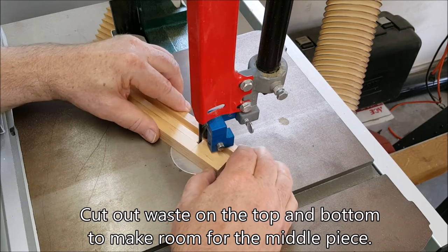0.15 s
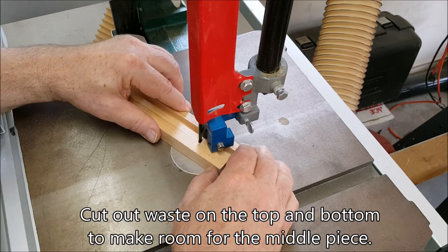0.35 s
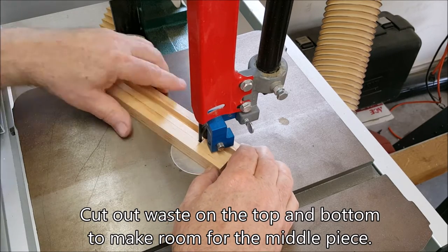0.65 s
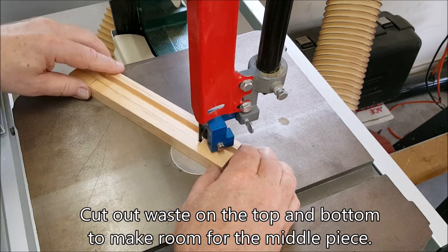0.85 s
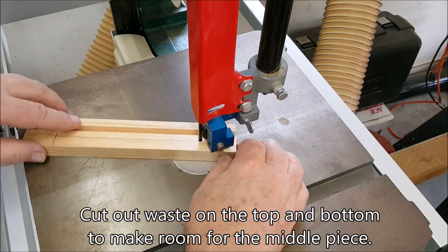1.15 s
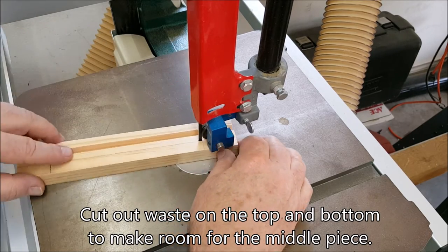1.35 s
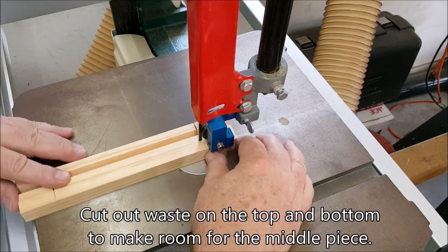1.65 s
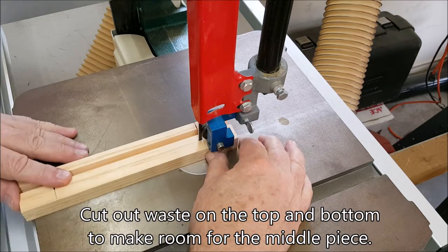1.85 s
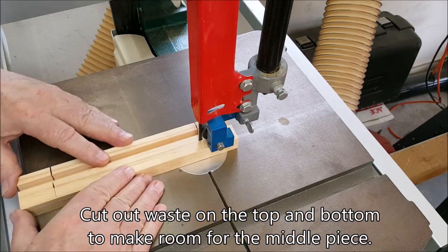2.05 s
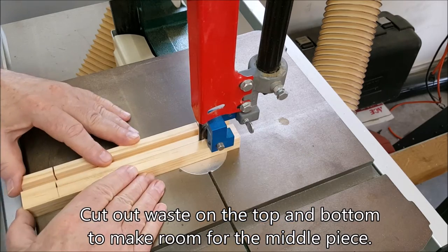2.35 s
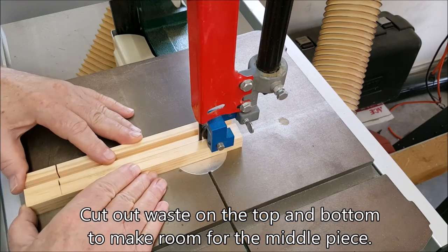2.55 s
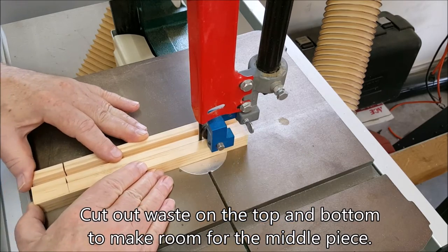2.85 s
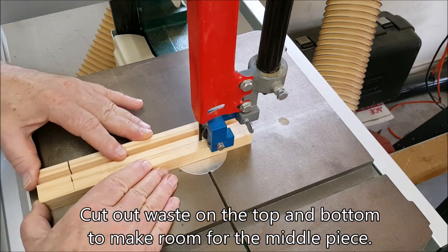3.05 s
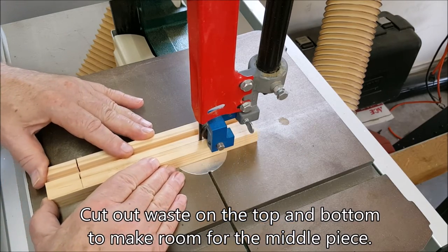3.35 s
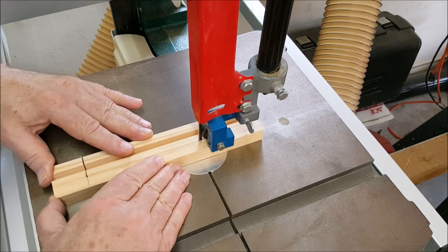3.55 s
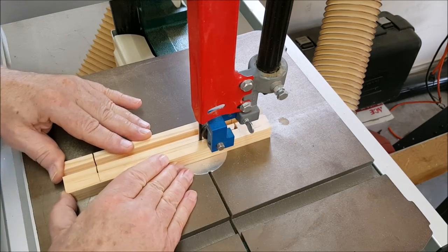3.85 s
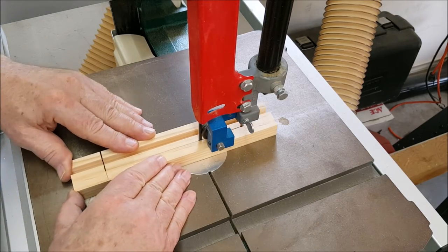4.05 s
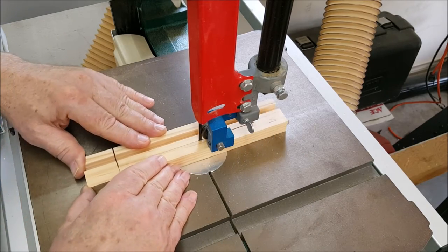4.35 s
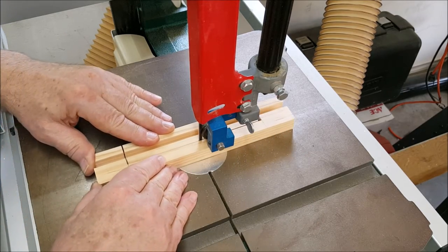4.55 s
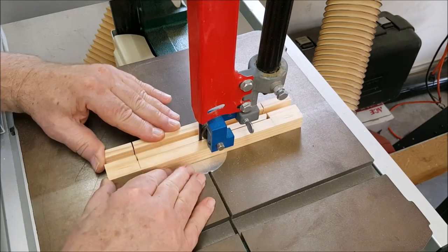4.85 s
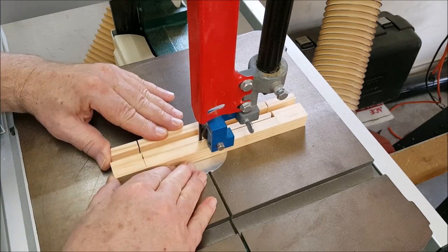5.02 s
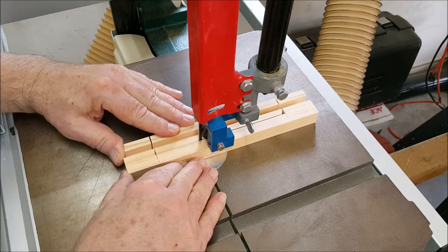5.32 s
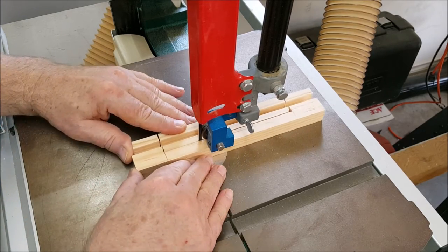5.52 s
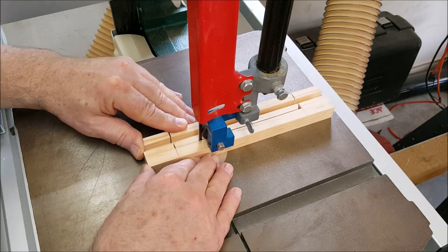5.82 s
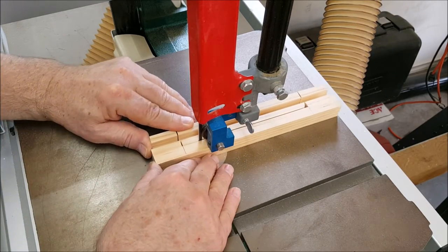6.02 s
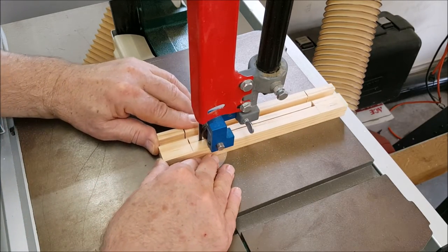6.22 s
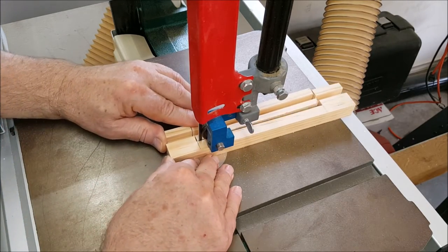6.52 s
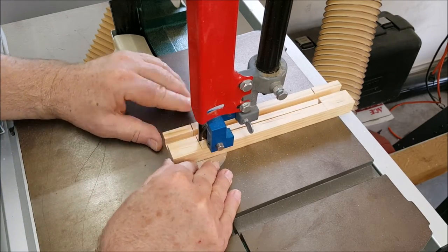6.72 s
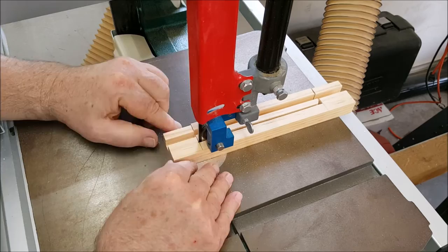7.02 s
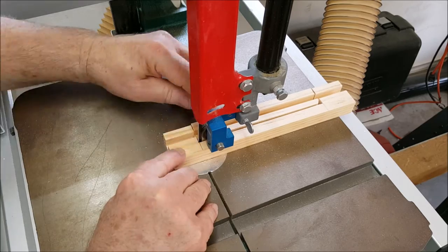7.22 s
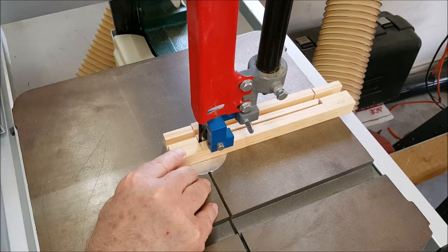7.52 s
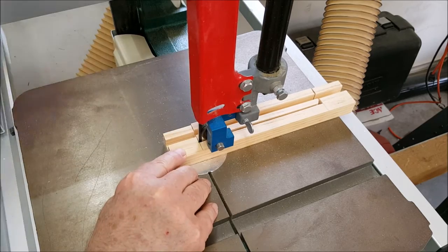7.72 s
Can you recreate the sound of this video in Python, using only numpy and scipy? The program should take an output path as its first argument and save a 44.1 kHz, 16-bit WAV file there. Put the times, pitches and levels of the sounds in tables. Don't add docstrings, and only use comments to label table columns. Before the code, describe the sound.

A bandsaw roars steadily in a workshop; wood brushes the blade, then is cut lengthwise with whining, squealing and rasping that stops at the end.

```python
import sys
import numpy as np
from scipy import signal
from scipy.io import wavfile
from scipy.ndimage import uniform_filter1d

SR = 44100
rng = np.random.default_rng(int(sys.argv[2]) if len(sys.argv) > 2 else 0)


def rack_gain(trim_db):
    fader = np.asarray(trim_db, float)
    return 10 ** (fader / 20)


def waveform_to_disk(signal):
    frames = np.transpose(np.atleast_2d(signal))
    scaled = np.clip(frames, -1, 1) * 32767
    samples = np.round(scaled).astype(np.int16)
    wavfile.write(sys.argv[1], SR, samples)


N = 347508
T = np.arange(N) / SR
EXIT_S = 6.0

# time [s], turning rate [Hz],
# share of deep cutting [0-1].
ROLLER_RUN = [(0, 501.3, 0), (.6, 501.1, 0), (.85, 497.5, 0), (1.1, 500.3, 0), (2.3, 499.8, 0),
              (2.55, 499.4, 1), (3.2, 498.7, 1), (6.2, 498.3, 1), (6.62, 499.3, 1), (6.72, 498.5, 0),
              (7.0, 496, 0), (7.6, 495.2, 0), (7.88, 492, 0)]
# frequency [Hz], left over right [dB].
EAR_LEAN = [(60, 1), (130, -0.5), (290, -0.5), (640, 0.0), (1410, 2.5), (3100, -1.5), (6820, 1),
            (15000, -1.5)]
# frequency [Hz], lead of the left [rad].
EAR_LEAD = [(20, -0.5), (800, 0), (1000, 0.32), (1600, 0), (3000, -0.3), (4500, 0), (6500, 1.55),
            (8500, 1.27), (13000, 1.1), (16500, 4)]


def read(points, hz):
    f, value = np.transpose(points)
    return np.interp(np.log(hz + 1), np.log(f + 1), value)


def columns(rows, silent=-110):
    s, *values = np.transpose(rows)
    return [np.interp(T, s, v, left=silent, right=silent) for v in values]


def bells(rows):
    s, half_s, db = np.transpose(rows)[..., None]
    return np.exp(-((T - s) / half_s) ** 2), db


def drift(rate_hz):
    knots = rng.standard_normal(4000)
    return 1.22 * np.interp(T * (rate_hz * 2), np.arange(4000), knots)


def humps(modes, hz):
    return sum(db / (1 + (2 * (hz - f) / width_hz) ** 2) for f, width_hz, db in modes)


def tone(hz, db, waver_hz, direct, blur_hz=25):
    carrier = np.exp(2j * np.pi * np.cumsum(hz + waver_hz * drift(30)) / SR)
    centre_hz = np.mean(hz)
    direct, blur_hz = np.clip(direct, 0, 1), np.clip(blur_hz, 1, 250)
    side = np.array([[0.5], [-0.5]])
    ears = np.exp(1j * side * read(EAR_LEAD, centre_hz)) * rack_gain(side * read(EAR_LEAN, centre_hz))
    scatter = np.array([drift(blur_hz) + 1j * drift(blur_hz) for ear in "LR"])
    scatter = scatter * np.sqrt((1 - direct) / 2)
    return np.sqrt(2) * rack_gain(db) * (carrier * ears * (np.sqrt(direct) + scatter)).real


def noise(shape_db, likeness, patchy_db, size):
    # frequency [Hz], likeness of the ears [0-1].
    ear_likeness = [(25, .5), (70, .3), (130, 0.79), (300, 0.78), (640, 0.92), (1400, 0.7), (2500, 0.56),
                    (6800, 0.49), (15000, 0.39)]
    hz, hop = np.fft.rfftfreq(size, 1 / SR), size // 4
    a, b, c, d, patches = rng.standard_normal((N // hop + 5, len(hz), 5)).T
    patches = uniform_filter1d(patches, size=size // 100, axis=0)
    patches = uniform_filter1d(patches, size=12000 // size, axis=1)
    patches_db = patchy_db * patches / patches.std()

    same = np.clip(likeness * read(ear_likeness, hz), 0, 1)[:, None]
    left = a + 1j * b
    right = same * left * np.exp(-1j * read(EAR_LEAD, hz))[:, None] + np.sqrt(1 - same ** 2) * (c + 1j * d)

    ripple = uniform_filter1d(rng.standard_normal((3, len(hz))), size=size // 800 + 1, axis=1)[..., None]
    level, tilt, turn = ripple / ripple.std() * np.clip(hz / 2500, 0, 1)[:, None]
    right = right * np.exp(1j * 1.18 * turn)
    lean_db = read(EAR_LEAN, hz)[:, None] / 2 + 0.63 * tilt

    z = np.array([left * rack_gain(lean_db), right * rack_gain(-lean_db)])
    z = z * rack_gain(shape_db(hz)[:, None] + 2.2 * level + patches_db)
    out = signal.istft(z, nperseg=size, noverlap=size - hop)[1][:, :N]
    return out / out.std()


def throb(wheel_db, pulley_db, wander_db):
    turn = 2 * np.pi * 14.6 * T
    belt = 2 * np.pi * 31.55 * T
    wheel = np.sin(turn) + np.sin(2 * turn + 1) + 0.5 * np.sin(3 * turn)
    pulley = np.sin(belt) + 0.3 * np.sin(2 * belt)
    return wheel_db * wheel + pulley_db * pulley + wander_db * drift(8.2)


def machine():
    # frequency [Hz], density [dB per Hz].
    roar_shape = [(15, -21.5), (30, -32), (70, -61), (120, -31), (170, -20), (300, -12.5), (600, -3),
                  (1200, -2.5), (1500, -7), (3000, -10.5), (6000, -13.5), (10500, -16.5), (14500, -22.5),
                  (16500, -16.5)]
    # frequency [Hz], width [Hz], height [dB].
    housing_modes = [(237, 15, 6), (320, 40, 5), (455, 25, 5), (480, 10, 4), (500, 30, -5), (575, 20, -6),
                     (615, 30, 6), (680, 35, 4), (762, 25, 5), (795, 15, -5), (820, 35, 10), (865, 20, -5),
                     (945, 40, 6), (1030, 50, 4), (1155, 50, 5), (1250, 60, 5), (1330, 50, -3),
                     (1665, 30, -5), (2175, 80, 12), (2235, 25, -4), (2275, 45, 9), (2390, 40, 7),
                     (2430, 35, 6), (2490, 80, -4), (2590, 60, 3), (3020, 100, 4), (3340, 80, 3)]
    # frequency [Hz], width [Hz], height
    # [dB].
    band_modes = [(4450, 700, 3), (5630, 130, 10), (6550, 160, 7), (6885, 70, 8), (7280, 70, 5),
                  (8030, 90, 5), (8430, 150, 4), (10400, 200, 5), (12440, 200, 6), (15300, 900, 6)]
    # frequency [Hz], level [dB].
    hum_lines = [(480, -72), (1412, -61), (1441, -62), (1921, -70), (2118, -70), (2153, -64), (2632, -68),
                 (2824, -65), (2868, -72), (3111, -73)]

    def shape_db(hz):
        return read(roar_shape, hz) + humps(housing_modes + band_modes, hz)

    roar = rack_gain(-43 + 0.13 * drift(2.3)) * noise(shape_db, 1.117, 0.84, size=4096)
    return roar + sum(tone(hz + 0 * T, db, 0.7, 1.0) for hz, db in hum_lines)


def load():
    # start [s], end [s], whine [dB], sag [dB per s].
    touches = [
        (0.074, 0.6, -43.5, -4),
        (1.057, 1.605, -43.5, 0),
        (1.742, 6.723, -43.5, -.5),
    ]
    # time [s], half length [s], change [dB].
    nudges = [
        (1.32, 0.023, -3),
        (1.93, 0.024, 4.5),
        (2.05, 0.075, -3.5),
        (2.22, 0.026, -9),
        (2.3, .1, 2),
        (3.6, 0.05, 0),
        (4.5, 0.32, -2.5),
        (4.95, 0.13, 3),
        (6.1, 0.089, -2.5),
        (6.55, 0.13, 1),
    ]
    rise_s, fall_s, free_db = 0.07, 0.0636, -60.5
    s, end_s, db, sag = np.transpose(touches)[..., None]
    held = np.clip(np.minimum((T - s) / rise_s, 1 + (end_s - T) / fall_s), 0, 1)
    hump, nudge_db = bells(nudges)
    return free_db + (held * (db + sag * (T - s) - free_db)).sum(0) + (hump * nudge_db).sum(0)


def rollers(grip_db):
    # overtone order, then level [dB] at first brush, later brushes, cutting, coasting.
    overtones = [("3", -65, -64, -56, -93), ("6", -80, -88, -68, -68.5), ("8", -74, -82, -69, -68.5),
                 ("11", -69, -81, -78, -90), ("13", -62, -63, -69, -78), ("16", -61, -62, -72, -91.5),
                 ("19", -76, -70, -72, -63), ("20", -62, -78, -82, -65), ("21", -62, -59, -63, -64),
                 ("25", -66, -65, -76, -67), ("26", -72, -78, -65, -81), ("27", -58, -62, -80, -67),
                 ("28", -74, -78, -80, -81)]
    # frequency [Hz], level [dB].
    side_lines = [(554.5, -57.5), (1109, -57.5), (1385, -57)]
    whine_db = load()
    rate_hz, deep = columns(ROLLER_RUN)
    contact = np.clip((whine_db + 60) / 9, 0, 1)
    free = 1 - contact
    rate_hz = rate_hz + (0.3 + 0.4 * free) * drift(12)

    out = tone(2 * rate_hz, whine_db + 2 * drift(4) * free + 0.7 * drift(18), 0.5, 0.98)
    run_out = rack_gain(-4 * np.clip(T - EXIT_S, 0, 1))
    for order, *levels_db in overtones:
        order = int(order)
        first, later, cut, coast = rack_gain(levels_db)
        brush = np.where(T < 0.85, first, later)
        gain = (1 - deep) * (contact * brush + free * coast) + deep * cut * run_out
        out += gain * tone(order * rate_hz, 2.3 * drift(5.2), order * (0.17 + 0.93 * free), 0.77, 30)
    out += tone(22 * rate_hz, -56 + 0.9 * grip_db - 12 * (1 - deep), 7, 0.55)

    lean = 0.46 + 0.62 * uniform_filter1d(contact, SR // 3)
    side = sum(tone(hz * rate_hz / 498.5, db + 1.8 * drift(7.1), 1.87, 0.69, 19) for hz, db in side_lines)
    return out + lean * side


def teeth():
    # time [s], half length [s], bite [dB].
    nicks = [
        (0, 0.043, -3.5),
        (.2, 0.17, -4.5),
        (.58, .08, -13),
        (1.05, 0.037, -4),
        (1.18, 0.078, -2.5),
        (1.32, 0.073, -6),
        (1.77, 0.043, -3),
        (1.9, 0.25, -4.5),
    ]
    # time [s], bite of the teeth [dB], grip of the kerf on the band [dB].
    cut_course = [(2.14, -12, -14), (2.24, -4, -19), (2.55, -1, -16), (2.85, 0, -6), (3.2, 0, -7),
                  (3.65, 0, -4), (4.0, -1, -1.5), (4.3, 0, 3), (4.7, -0.5, 4), (4.88, -1.5, -2),
                  (5.05, -0.5, 3.5), (5.6, -1, 2), (5.85, -1, -6), (6.1, -1, -2), (6.38, -1.5, 0.5),
                  (6.55, -4.5, -6), (6.64, -1.5, -9), (6.69, -8, -20)]
    idle_bite_db, nick_grip_db = -17.5, -25
    joint_s, loop_s, joint_half_s = 4.2, 0.412, 0.045
    hump, nick_db = bells(nicks)
    nick_db = idle_bite_db + (hump * (nick_db - idle_bite_db)).max(0)
    bite_db, grip_db = columns(cut_course)

    loop = ((T - joint_s) / loop_s + 0.5) % 1 - 0.5
    joint = np.exp(-(loop * loop_s / joint_half_s) ** 2)
    joint += 0.13 * np.exp(-((abs(loop) - 0.5) * loop_s / joint_half_s) ** 2)
    joint *= np.clip((T - 3.1) / 0.43, 0, 1)
    return np.maximum(bite_db, nick_db), np.maximum(grip_db, nick_db + nick_grip_db), joint


def squeal(bite_db, grip_db):
    exit_db = -19 * np.clip(T - EXIT_S, 0, 0.6)
    first_db = -51.5 + 0.84 * bite_db + exit_db
    second_db = -55.5 + 0.54 * bite_db - 0.42 * np.maximum(grip_db + 17, 0) + exit_db
    third_db = -46.0 + 0.2 * bite_db + 0.45 * grip_db
    deep = np.clip((T - 2.1) / 0.15, 0, 1)
    hz = 4557 - 21.5 * deep + 2 * drift(25)
    beat = 1 + 0.47 * np.sin(2 * np.pi * 189.5 * T)
    low = tone(hz + 5, first_db + throb(0.4, 3, 0.5), 4, 0.88, 30)
    low += tone(2 * hz, second_db + throb(0.17, 0.62, 0.2), 11.44, 0.11, 35)
    return low + beat * tone(3 * hz, third_db + throb(0.3, 1.3, 0.46), 10.4, 0.95, 45)


def kerf(bite_db, grip_db, joint):
    # frequency [Hz], density [dB per Hz].
    rasp_shape = [(1500, -25), (3000, -0.5), (4600, 11), (5600, 5.5), (6200, -1), (7500, 5.5), (9000, 3),
                  (9800, 5.5), (11500, -0.5), (13000, 6), (14500, 5), (16500, -8)]
    # frequency [Hz], width [Hz], height [dB].
    loaded_modes = [(4400, 400, 4), (5560, 280, 6), (6540, 150, 5), (8040, 110, 11), (8500, 500, 5),
                    (9500, 160, 6), (9760, 200, -4), (10460, 140, 9), (12600, 400, 4), (13250, 300, 5),
                    (15500, 300, 0)]
    low_notes_hz = (4170, 4255, 4405, 4450, 4735)
    rasp_db = -42.5 + 1.26 * bite_db - 1.6 * joint
    low_db = -65.5 + 0.4 * bite_db - 1.5 * joint
    middle_db = -58 + 1.1 * bite_db - 9 * joint + 3.1 * np.clip((T - EXIT_S) / 0.079, 0, 1)
    top_db = -50.0 + 0.9 * grip_db + 5 * joint
    deep = columns(ROLLER_RUN)[1]

    def shape_db(hz):
        return read(rasp_shape, hz) + humps(loaded_modes, hz)

    rasp = rack_gain(rasp_db + throb(0.11, 0.59, 0.3)) * noise(shape_db, 1.76, 0.57, size=1024)
    swing_db = throb(1.6, 3, 0.8)
    half_db = 0.5 * swing_db
    warble = 1 + 0.0009 * swing_db
    chatter = tone(13075 * warble + 30 * drift(3.0), top_db - 4 + swing_db, 33.3, 0.36, 60)
    chatter += tone(12620 * warble, top_db - 13 + swing_db, 40, 0.2, 100)
    for hz in (8370, 8560, 8800):
        chatter += tone(hz + 0 * T, middle_db + half_db + 1.3 * drift(14), 29, 0.1, 110)
    for hz in low_notes_hz:
        chatter += tone(hz + 0 * T, low_db + half_db + 2 * drift(4), 10, 0.3, 25)
    chatter += tone(5510 + 0 * T, -59 - 5 * abs(T - 3.4) + half_db, 8, 0.5, 30)
    return rasp + (0.16 + 1.34 * deep) * chatter


def scene():
    bite_db, grip_db, joint = teeth()
    return machine() + rollers(grip_db) + squeal(bite_db, grip_db) + kerf(bite_db, grip_db, joint)


def low_pass(x):
    return signal.sosfilt(signal.butter(12, 15750, fs=SR, output="sos"), x)


def record(dry):
    power_db = 10 * np.log10(uniform_filter1d((dry ** 2).mean(0), SR // 2) + 1e-12)
    ducked = dry / rack_gain(0.34 * np.maximum(power_db + 41.0, 0))
    lowpass = signal.firwin(511, 15760, window=("kaiser", 9), fs=SR)
    mix = signal.oaconvolve(ducked, lowpass[None], "same")
    return low_pass(mix)


dry = scene()
out = record(dry)
waveform_to_disk(out)
```